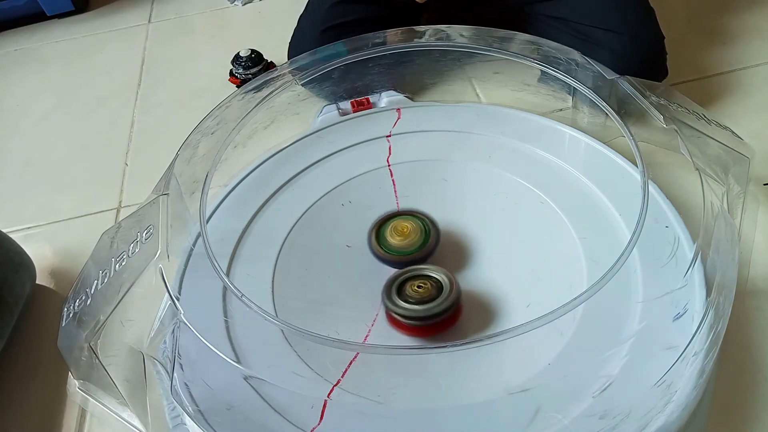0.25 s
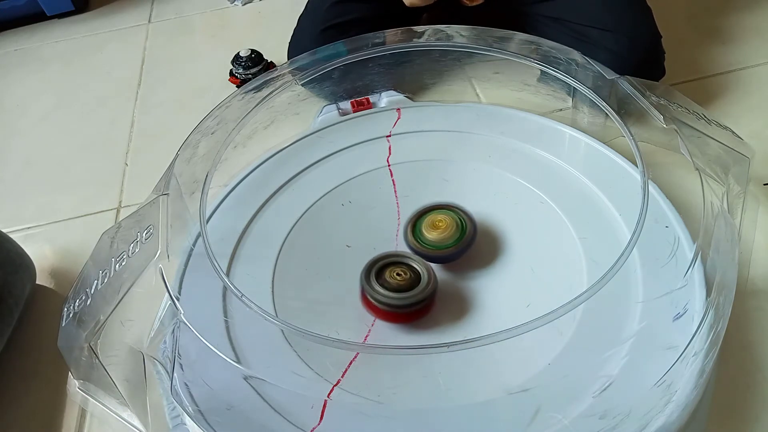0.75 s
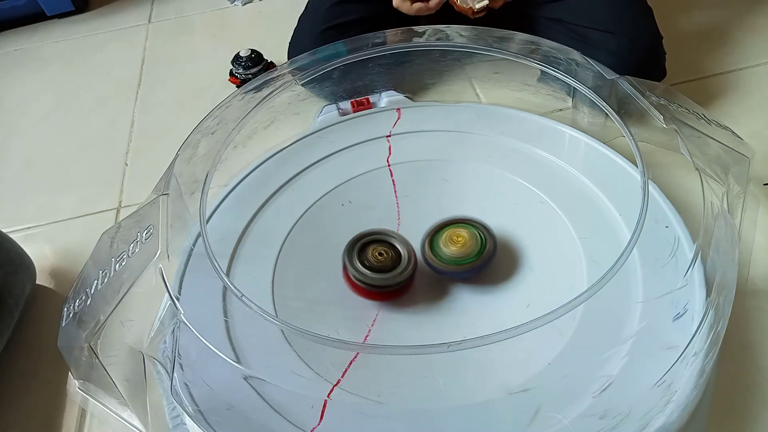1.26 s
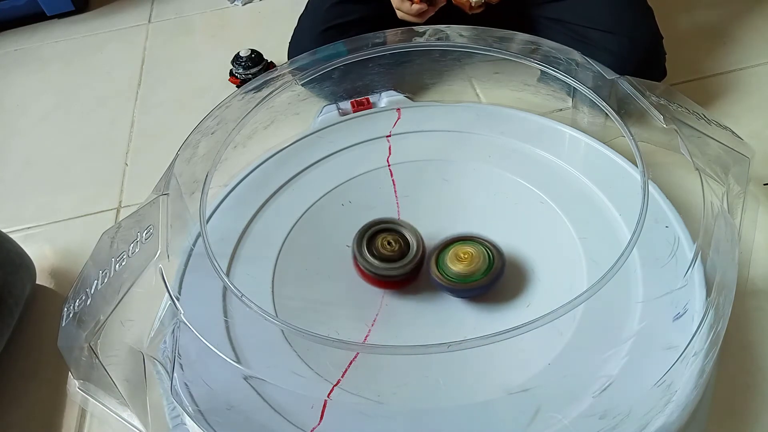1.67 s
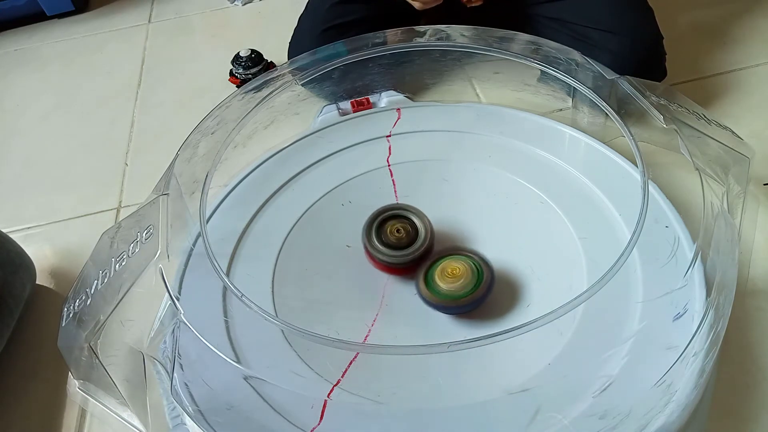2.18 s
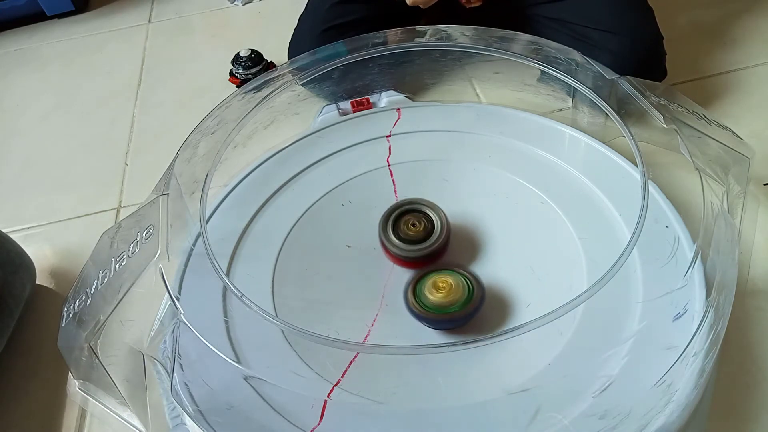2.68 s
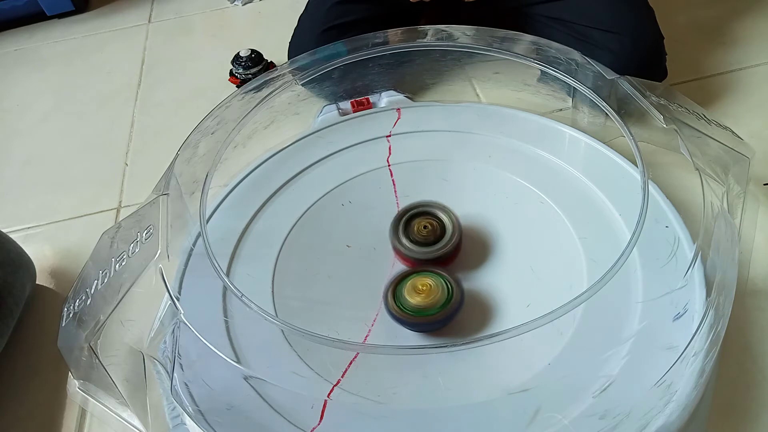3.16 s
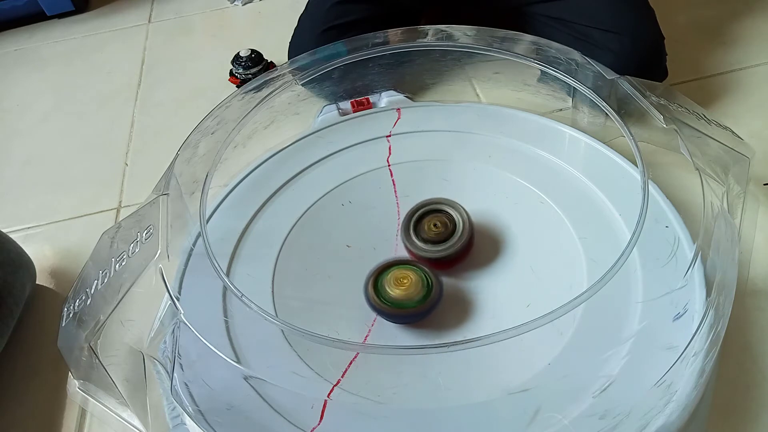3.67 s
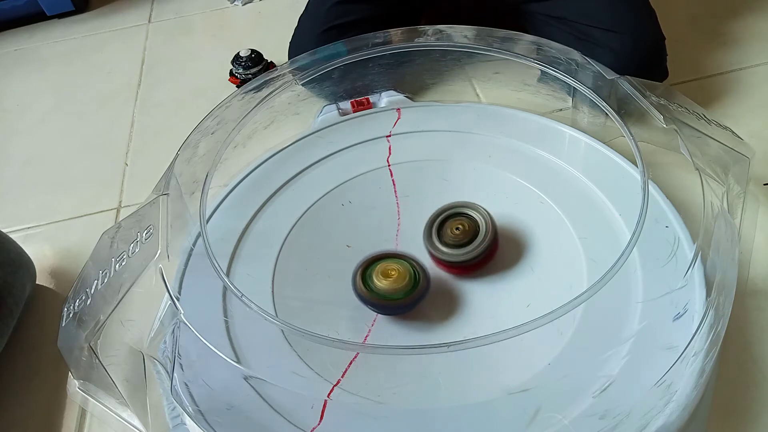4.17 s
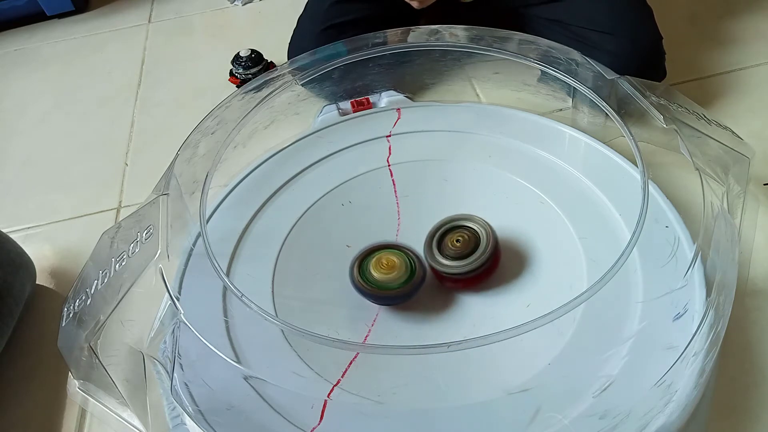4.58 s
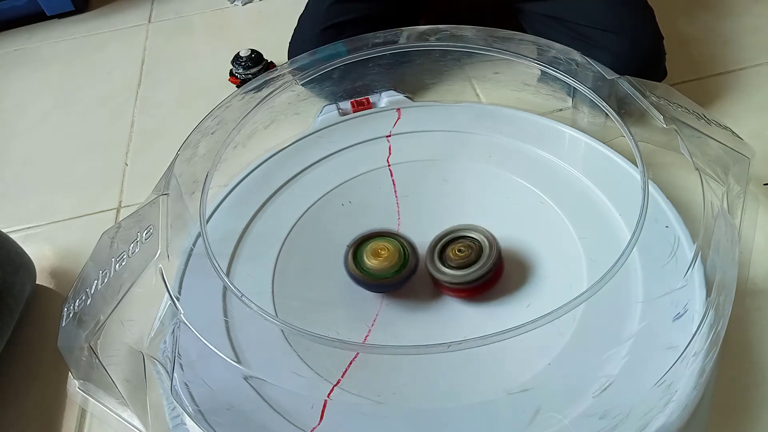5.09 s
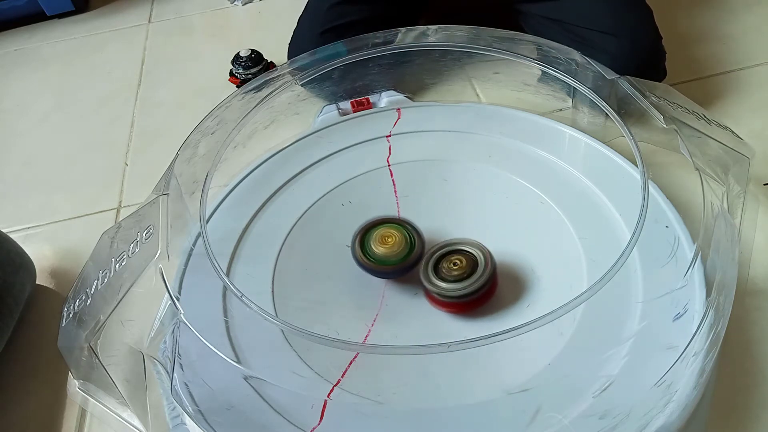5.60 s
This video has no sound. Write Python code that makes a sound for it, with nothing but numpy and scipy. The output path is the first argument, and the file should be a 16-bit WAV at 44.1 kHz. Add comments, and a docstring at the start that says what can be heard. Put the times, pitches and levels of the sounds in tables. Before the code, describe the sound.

Two small metal-rimmed spinning tops clack and knock irregularly in a thin plastic bowl over a faint whirr, finally grinding together.

```python
"""Two metal-rimmed spinning tops circle in a domed plastic arena on a tiled floor, heard by one small microphone.
From the start their tips whirr and skip on the plastic: noise coloured by the bowl, and chance faint taps.
Soon the tops clash, again and again: a clack scattered by the dome, a thump of the thin bowl's modes and walls,
a faint fluttering ring of the rims when metal meets metal squarely, then the room.
A hum at the rate of spin joins midway; at the end the rims stay in touch and grind in a run of tiny blows."""
import sys
import numpy as np
from scipy import signal
from scipy.io import wavfile

SR = 44100
rng = np.random.default_rng(int(sys.argv[2]) if len(sys.argv) > 2 else 0)


def dump(signal):
    """Clip the signal to [-1, 1] and save it as 16-bit WAV at the path in sys.argv[1]."""
    limited = np.clip(np.atleast_2d(signal).T, -1, 1)
    pcm = np.round(limited * 32767).astype(np.int16)
    wavfile.write(sys.argv[1], SR, pcm)


N = 257569

# colour of the tips running on plastic: (frequency [Hz], level [dB])
WHIRR_COLOUR = [(20, -25), (50, -9.5), (110, -1.5), (170, -3), (350, -1), (700, -9.5), (1100, -11),
                (1400, -11.5), (1900, -18), (3400, -18), (5300, -34), (7300, -21), (9500, -36),
                (15000, -48)]
# how hard the tips scrub: (time [s], level [dB])
SCRUB_CURVE = [(0, -44.5), (.15, -52.5), (2.5, -58), (5.84, -52.5)]
# colour of the rims rubbing: (frequency [Hz], level [dB])
RUB_COLOUR = [(60, -22), (200, -12), (700, -2.5), (1200, -9.5), (1900, -6.5), (2650, 0.5), (3000, -6),
              (3450, -0.5), (4300, -10.5), (5400, -16), (7300, -7), (9200, -18.5), (13000, -27),
              (15200, -22)]
# decay of the room: (frequency [Hz], t60 [s])
ROOM_DECAY = [(100, 0.62), (300, 0.28), (1000, 0.32), (3000, 0.34), (7500, 0.3), (14000, 0.24)]
# low clanking modes of the metal rims: (frequency [Hz], level [dB], t60 [s])
CLANK_MODES = [(3560, -11, 0.22), (3150, 9, 0.25), (3200, 3, 0.4), (3260, -8, 0.27), (3700, -10, 0.27)]
# pure ringing lines of the rims, the main mode and a sideband about one spin rate above:
# (frequency [Hz], level [dB], t60 [s])
PURE_RING_LINES = [(4002, 2, 0.73), (4097, -7, 0.75)]
# high tinkling modes of the rims: (frequency [Hz], level [dB], t60 [s])
TINKLE_MODES = [(7900, 0, 0.22), (10200, 3, .25), (10090, -9, .27), (10100, -8, 0.27), (10260, 3, 0.29),
                (10400, -9, .25)]
# modes of the plastic bowl: (frequency [Hz], level [dB], t60 [s])
BOWL_MODES = [(122.2, -10.5, 0.66), (161.3, 1, 0.21), (203, -3.5, 0.3), (259, -11, 0.26),
              (333.7, 0.5, 0.14), (344.8, -4.5, 0.2), (426, -3, 0.054), (551, -5, 0.24), (736, -46, 0.13),
              (706.7, -1.5, 0.096), (874, -51, 0.47), (1544, -24.5, 0.15)]
# colour of the dense flexing of the arena's walls: (frequency [Hz], level [dB])
WALL_COLOUR = [(30, -35), (65, -12), (110, -10), (180, -3), (330, 0.5), (400, -2), (450, 2), (700, -8),
               (1000, -9.5), (1500, -18), (3000, -36)]
# colour of a clack inside the dome: (frequency [Hz], level [dB])
CLACK_COLOUR = [(300, -47), (900, -11.5), (1450, -5.5), (1950, -7), (2650, -1), (3400, -1), (4300, -5),
                (5300, -16), (6400, -8), (7400, -1.5), (9200, -15.5), (10200, -17), (13500, -19),
                (15200, -13)]
# one row a clash, levels before the trims in clashes():
# (time [s], clack of the tops [dB], thump of the bowl [dB], how squarely metal meets metal [0-1])
CLASH_ROWS = [(0.2068, -43, -38, 0), (.2555, -45.5, -37, 0.7), (0.4606, -32.5, -28.5, 0.6),
              (0.7385, -41.5, -32.5, 0), (.801, -50, -44, 0), (.8376, -47, -45, 0), (.902, -51.5, -61, 0),
              (.929, -47.5, -42.5, 0), (.99, -49.5, -44, 0.05), (1.117, -40, -42, 0),
              (1.1918, -53.5, -51, 0), (1.2184, -39.5, -37.5, 0.05), (1.3801, -37.5, -29, 0.36),
              (1.5284, -41, -34.5, 0), (1.613, -39.5, -32, 0.1), (1.756, -40.5, -33, 0.4),
              (1.9678, -50, -45, 0.1), (1.9797, -55, -43, 0), (1.9927, -34.5, -31, 0.26),
              (2.2211, -54.5, -55, 0.1), (2.2336, -36, -30.5, 0), (2.352, -47, -66, 0),
              (2.3656, -31.5, -26.5, 0.4), (2.6141, -30, -28.5, 0.98), (2.811, -30, -29.5, 0.66),
              (3.0786, -32, -33.5, 0.3), (3.1677, -37.5, -29.5, 0.25), (3.3428, -40.5, -30.5, 0),
              (3.433, -46, -38, 0), (3.4632, -39, -34.5, 0.2), (3.6438, -40, -36.5, 0),
              (3.732, -52, -43.5, 0), (3.7477, -47.5, -36.5, 0), (3.8661, -56, -57, 0),
              (3.8789, -49, -40.5, 0), (3.9993, -42.5, -36.5, 0), (4.0771, -33.5, -27, 0.57),
              (4.3565, -39.5, -40, 0.1), (4.4031, -48, -37.5, 0.1), (4.464, -39, -35, 0),
              (4.65, -45.5, -38.5, 0.2), (4.6979, -47.5, -38.5, 0), (4.7655, -32, -29.5, 0.05),
              (5.048, -29, -27, 0.1), (5.1928, -32, -28, 0.63), (5.3138, -41.5, -37.5, 0.1),
              (5.4133, -49, -44.5, 0), (5.5128, -48, -44.5, 0), (5.5788, -43.5, -41, 0),
              (5.629, -42, -35.5, 0), (5.731, -40.5, -34, 0)]

TIME = np.arange(N) / SR
AGE = np.arange(SR) / SR  # time since a blow (s)
BLOW = 1764  # samples in the body of a blow, 40 ms
EDGE_HZ = 15550  # the recorder's upper limit

# mean spin at first (turns per s) and its loss to friction (turns per s, each s)
SPIN_HZ, SAG_HZ_PER_S = 101.8, 0.7
# a top's imbalance shakes the bowl once a turn while it leans; the level wavers about HUM_DB
LEAN_START_S, LEAN_END_S, LEAN_FADE_S, HUM_DB = 2.45, 5.73, 0.26, -56
# the rims come to rest on each other: first touch, rise of the pressure, full level
GRIND_START_S, GRIND_RISE_S, GRIND_DB = 5.475, 0.27, -31.5

# for clank, pure ring and tinkle: gain on the tones over the clack's level in a fully square blow (dB),
# power of squareness they follow, depth of flutter (share), rate of flutter (Hz)
RIM_DB, RIM_POWER = (-8, -14, -10), (2.5, 0.29, 1.5)
RIM_FLUTTER, RIM_FLUTTER_HZ = (0.4, 0.2, 0.9), (25, 20, 70)

# the bowl's strongest resonance and how far the place of the blow shifts it (share)
THUMP_HZ, THUMP_SPREAD = 331.5, 0.068
# a middling clash, in the levels of the clash table, and the hardness of its thump
USUAL_CLACK_DB, USUAL_THUMP_DB, USUAL_HARD_DB = -39.5, -35, -4.5
# a sharp clack hardens the thump, a heavy heave softens it (dB per dB)
HARDENING, SOFTENING = 0.36, 0.65
# in a fully square blow the rims take the shock and the thump is duller
SQUARE_DULL_DB = 4.5

# a clack's treble over its body; the resonance that stands out and its shift with the point of contact (share)
BRIGHT_DB, CLACK_HZ, CLACK_SPREAD = -2, 3610, 0.044
# a square blow makes the metal sing lower and stronger: its resonance, the lift when glancing and when square
SING_HZ, GLANCE_SING_DB, SQUARE_SING_DB = 3300, 4.5, 8.5


def amp(db):
    """Decibels to gain."""
    return 10 ** (np.asarray(db) / 20)


def rms(x):
    """Root mean square."""
    return np.sqrt(np.mean(x ** 2) + 1e-20)


def read(points, hz):
    """Reads a table of (frequency [Hz], value) on a log-frequency axis."""
    f, value = np.transpose(points)
    return np.interp(np.log(hz + 1), np.log(f), value)


def follow(rows):
    """The columns of a curve, sample by sample."""
    s, *columns = np.transpose(rows)
    return [np.interp(TIME, s, c) for c in columns]


def ramp(start_s, rise_s):
    """Rises evenly from 0 to 1, then holds."""
    return np.clip((TIME - start_s) / rise_s, 0, 1)


def waver(hz):
    """Slow chance of about unit size, with hz new values a second."""
    return np.interp(TIME * hz, np.arange(len(AGE)), rng.standard_normal(len(AGE)))


def add(mix, s, sound):
    """Lays a sound into the mix at time s."""
    part = mix[max(round(s * SR), 0):][:len(sound)]
    part += sound[:len(part)]


def band(x, lo_hz, hi_hz):
    """Gentle band-pass."""
    return signal.sosfilt(signal.butter(2, [lo_hz, hi_hz], "band", fs=SR, output="sos"), x)


def stress(x, hz, width_hz, boost_db):
    """Lifts one resonance."""
    resonance = signal.lfilter(*signal.iirpeak(hz, hz / width_hz, fs=SR), x)
    return x + (amp(boost_db) - 1) * resonance


def colour(x, points, ripple_db=0, ripple_hz=130, size=4096):
    """Causal filter with a given spectrum; near reflections add chance peaks and notches on a ripple_hz grid."""
    hz = abs(np.fft.fftfreq(size, 1 / SR))
    ripple = np.interp(hz / ripple_hz, np.arange(size), rng.standard_normal(size))
    log_gain = np.log(amp(read(points, hz) + ripple_db * ripple))
    minimum_phase = np.exp(np.conj(signal.hilbert(log_gain)))
    taps = np.fft.ifft(minimum_phase).real[:size // 2]
    return signal.fftconvolve(x, taps)[:len(x)]


def room_tail(size=256):
    """A fresh pattern of dense reflections of unit energy, each frequency dying at its own rate."""
    hz, t, z = signal.stft(rng.standard_normal(SR // 2), SR, nperseg=size)
    decay = amp(-60 * t / read(ROOM_DECAY, hz)[:, None])
    tail = signal.istft(z * decay, SR, nperseg=size)[1][:SR // 2]
    tail *= 1 - np.exp(-AGE[:len(tail)] / 0.0038)  # reflections gather over a few ms
    return tail / np.linalg.norm(tail)


def scatter(rise, fall, room_db, lumps_db=3, direct=0.45):
    """A blow bouncing about under the dome: uneven echoes swell for a few ms, fade, and leave the room ringing."""
    tail = room_tail()
    t = AGE[:len(tail)]
    growing = direct + (1 - direct) * (t / rise) ** 2
    fading = np.exp(-np.maximum(t - rise, 0) / fall)
    swell = np.where(t < rise, growing, fading)
    lumps = amp(lumps_db * np.interp(t * 900, np.arange(500), rng.standard_normal(500)))
    burst = lumps * swell * rng.standard_normal(len(t))
    tail = tail * np.sqrt(lumps)
    return burst / np.linalg.norm(burst) + amp(room_db) * tail / np.linalg.norm(tail)


def ring(tones, spread_db=0):
    """Dying tones; with a spread, the point of contact favours some of them by chance."""
    hz, db, t60 = np.transpose(tones)[:, :, None]
    t = AGE[:round(min(t60.max(), 1) * SR)]
    chance_db = spread_db * rng.standard_normal(hz.shape)
    decaying = amp(db + chance_db - 60 * t / t60)
    return (decaying * np.sin(2 * np.pi * hz * t)).sum(0)


def tips(hiss_db=-2, drone_db=-10):
    """The tips hiss on the plastic, throbbing once a turn, and keep the bowl's modes droning; the imbalance hums."""
    turns_hz = SPIN_HZ - SAG_HZ_PER_S * TIME
    turn = 2 * np.pi * np.cumsum(turns_hz * (1 + 0.0192 * waver(15))) / SR
    pressure_db = 2 * waver(300) + 2.5 * waver(25) + 1.8 * np.sin(turn)
    grain = rng.standard_normal(N) * amp(pressure_db)
    hiss = colour(grain, WHIRR_COLOUR, ripple_db=2.5, ripple_hz=95.6)
    drone = signal.fftconvolve(grain, ring(BOWL_MODES))[:N]
    whirr = amp(hiss_db) * hiss / rms(hiss) + amp(drone_db) * drone / rms(drone)
    lean = ramp(LEAN_START_S, LEAN_FADE_S) - ramp(LEAN_END_S - LEAN_FADE_S, LEAN_FADE_S)
    hum = np.sqrt(2) * np.sin(turn) * lean * amp(HUM_DB + 4.3 * waver(14))
    return amp(follow(SCRUB_CURVE)[0]) * whirr + hum


def skitter(skips_hz=22, skip_db=-1):
    """The tips hop over scratches in the bowl: faint random taps, louder as they scrub harder."""
    out = np.zeros(N)
    scrub_db = follow(SCRUB_CURVE)[0]
    for _ in range(3):  # three different taps share the skips
        tap = 0.45 * clack(-2, 3500) + thump(330, -3)
        hops = (rng.random(N) < skips_hz / 3 / SR) * rng.uniform(-1, 1, N)
        out += signal.fftconvolve(hops * amp(scrub_db + skip_db), tap)[:N]
    return out


def grind(catches_hz=1500, room_db=-2, rattle_hz=190, rattle_db=4):
    """The rims catch on each other in a dense run of tiny blows that swell and ease as their lobes pass."""
    lobes = np.sin(2 * np.pi * np.cumsum(rattle_hz * (1 + 0.15 * waver(60))) / SR)
    blows = (rng.random(N) < catches_hz / SR) * rng.standard_normal(N)
    catches = blows * amp(rattle_db * lobes)
    contact = amp(GRIND_DB) * ramp(GRIND_START_S, GRIND_RISE_S)
    echoes = scatter(rise=0.003, fall=0.0025, room_db=room_db, lumps_db=4, direct=0.36)
    echoes = colour(echoes, RUB_COLOUR)
    # the metal sings in two broad resonances
    echoes = stress(echoes, 3370, width_hz=220, boost_db=5.5)
    echoes = stress(echoes, 6870, width_hz=420, boost_db=8.0)
    return signal.fftconvolve(contact * catches / rms(catches), echoes / np.linalg.norm(echoes))[:N]


def rims():
    """Square blows leave the rims ringing; as they spin and drift the sound flutters, most in the short waves."""
    out = np.zeros(N)
    families = zip((CLANK_MODES, PURE_RING_LINES, TINKLE_MODES), RIM_DB, RIM_POWER, RIM_FLUTTER, RIM_FLUTTER_HZ)
    for tones, db, power, flutter, flutter_hz in families:
        ringing = signal.hilbert(ring(tones), len(AGE))
        for s, clack_db, _, square in CLASH_ROWS:
            if square > 0:
                chance = rng.standard_normal((2, len(AGE)))
                drift = signal.lfilter(*signal.butter(2, flutter_hz, fs=SR), chance)
                wobble = (drift[0] + 1j * drift[1]) / rms(drift)
                fluttering = (ringing * (1 + flutter * wobble)).real / np.sqrt(1 + 2 * flutter ** 2)
                add(out, s, amp(clack_db + db) * square ** power * fluttering)
    return out


def thump(main_hz, hard_db, push_db=-6, modes_db=-3, walls_db=-3, push_hz=260, push_width=0.0037):
    """The tips kick the bowl: a quick heave, its modes, the rattle of the walls; a harder kick reaches higher."""
    walls = scatter(rise=0.0056, fall=0.017, room_db=9.5, lumps_db=3, direct=0.89)
    walls = colour(walls, WALL_COLOUR, ripple_db=3.5, ripple_hz=60.4)
    t = AGE[:len(walls)] - 0.0038  # the heave is centred just after the contact
    push = -np.sin(2 * np.pi * push_hz * t) * np.exp(-(t / push_width) ** 2)
    modes = ring(BOWL_MODES, spread_db=2.5)
    sound = amp(push_db) * push / rms(push[:BLOW]) + amp(walls_db) * walls / rms(walls[:BLOW])
    add(sound, 0.0022, amp(modes_db) * modes / rms(modes[:BLOW]))
    sound = stress(sound, main_hz, width_hz=47, boost_db=3.5)
    body = rms(band(sound, 100, 500)[:BLOW])
    knock = rms(band(sound, 550, 1400)[:BLOW])
    lift_db = hard_db - 20 * np.log10(knock / body)
    # so small a bowl radiates little deep bass
    tilt = [(35, -10.5), (70, -10.5), (110, -1.0), (380, -1.0), (650, lift_db), (1500, lift_db - 2.0)]
    return colour(sound / body, tilt)


def clack(bright_db, main_hz, sing_db=5):
    """Rim strikes rim under the dome: one resonance stands out, and bright_db sets the treble over the body."""
    sound = scatter(rise=0.0032, fall=0.0036, room_db=-1.5, lumps_db=4.5, direct=0.59)
    sound = colour(sound, CLACK_COLOUR, ripple_db=3.5)
    sound = stress(sound, main_hz, width_hz=160, boost_db=sing_db)
    body = rms(band(sound, 1500, 5000)[:BLOW])
    treble = rms(band(sound, 6000, 15000)[:BLOW])
    lift_db = bright_db - 20 * np.log10(treble / body)
    return colour(sound / body, [(4000, 0), (7000, lift_db), (14000, 1.47 * lift_db)])


def clashes(tops_db=-0.7, bowl_db=-0.74):
    """Each clash sounds tops and bowl; strengths, squareness and chance point of contact set its colour."""
    out = np.zeros(N)
    contacts = rng.uniform(-1.2, 1, (len(CLASH_ROWS), 2))
    for (s, clack_db, thump_db, square), (on_rim, on_bowl) in zip(CLASH_ROWS, contacts):
        metal = square ** 3
        glance_hz = CLACK_HZ * (1 + CLACK_SPREAD * on_rim)
        clack_hz = (1 - metal) * glance_hz + metal * SING_HZ
        sing_db = (1 - metal) * GLANCE_SING_DB + metal * SQUARE_SING_DB
        sharper_db = HARDENING * (clack_db - USUAL_CLACK_DB)
        heavier_db = SOFTENING * (thump_db - USUAL_THUMP_DB)
        hard_db = USUAL_HARD_DB + sharper_db - heavier_db - metal * SQUARE_DULL_DB
        thump_hz = THUMP_HZ * (1 + THUMP_SPREAD * on_bowl)
        add(out, s, amp(tops_db + clack_db) * clack(BRIGHT_DB, clack_hz, sing_db))
        add(out, s, amp(bowl_db + thump_db) * thump(thump_hz, hard_db))
    return out


def scene():
    """Whirr, skitter, grinding, ringing rims and clashes at one microphone."""
    return (tips() + skitter() + grind() + rims() + clashes())[None]


def record(dry):
    """The small microphone loses the deep bass; then the recorder's band limit."""
    thin = signal.sosfilt(signal.butter(2, 50, "high", fs=SR, output="sos"), dry)
    limit = signal.firwin(401, EDGE_HZ, window=("kaiser", 8), fs=SR)
    return signal.oaconvolve(thin, limit[None], "same")


dry = scene()
out = record(dry)
dump(out)
```